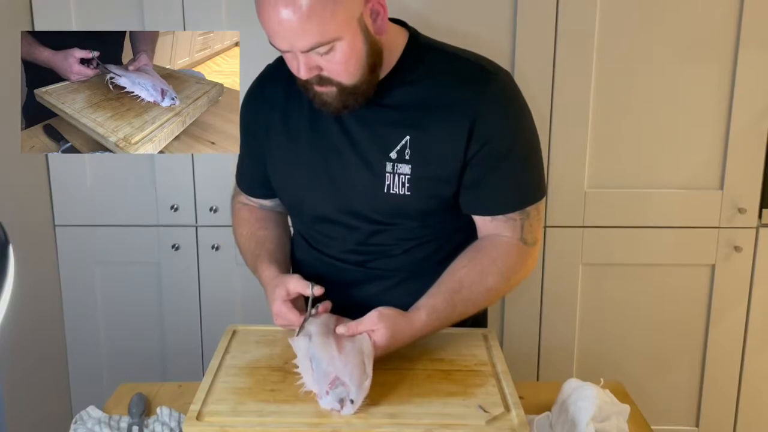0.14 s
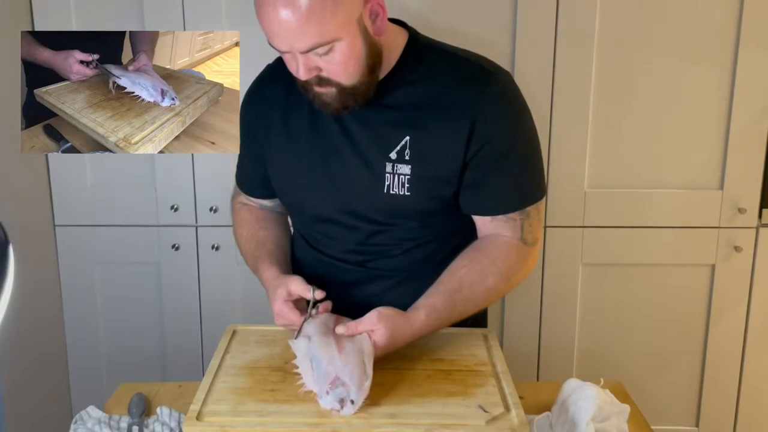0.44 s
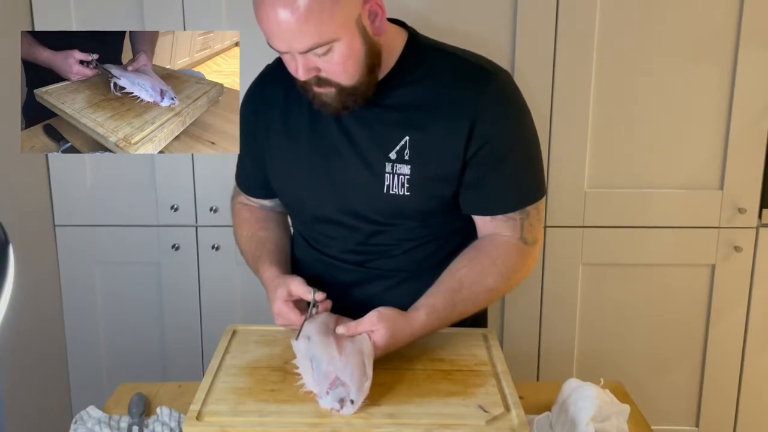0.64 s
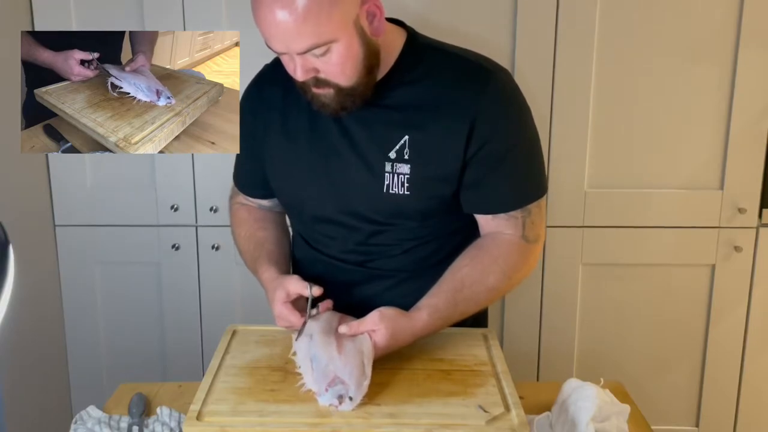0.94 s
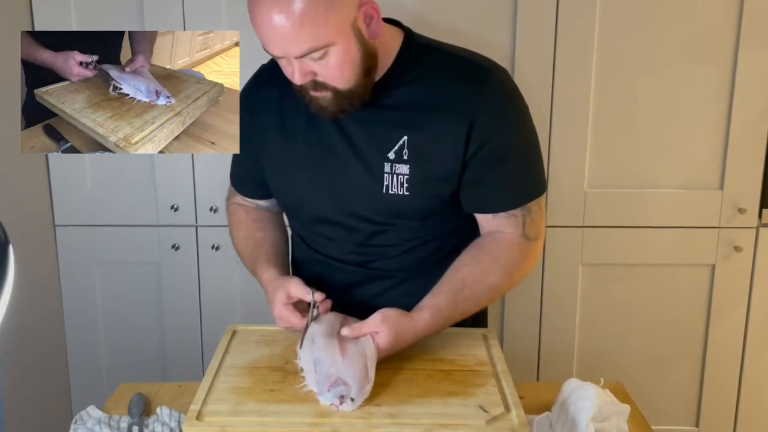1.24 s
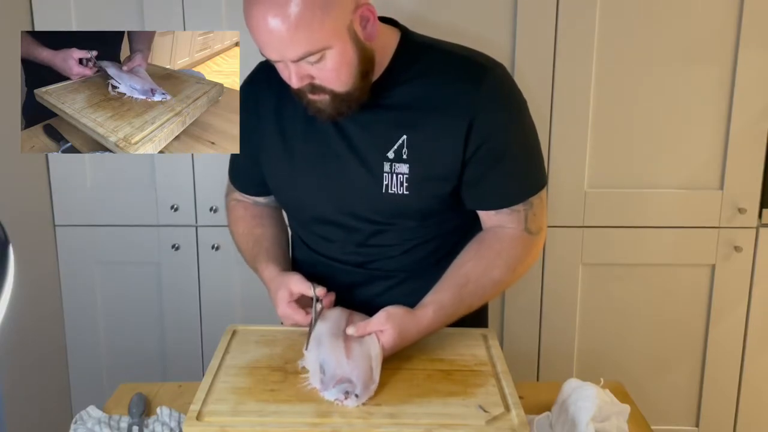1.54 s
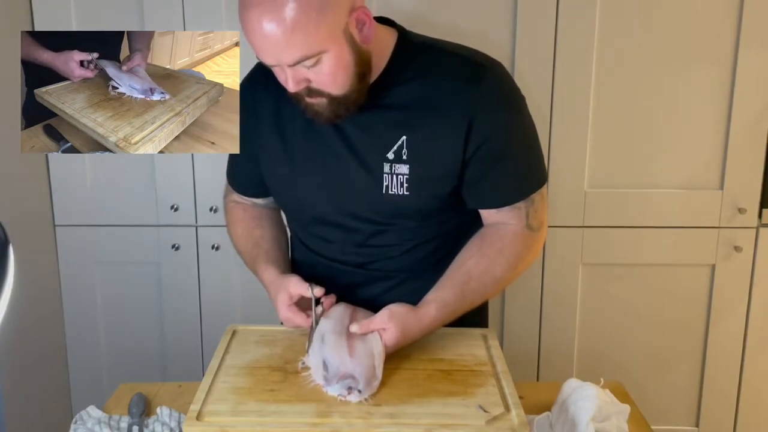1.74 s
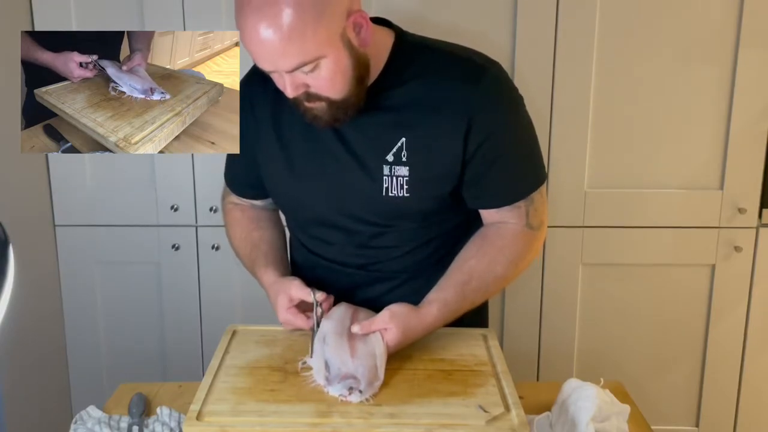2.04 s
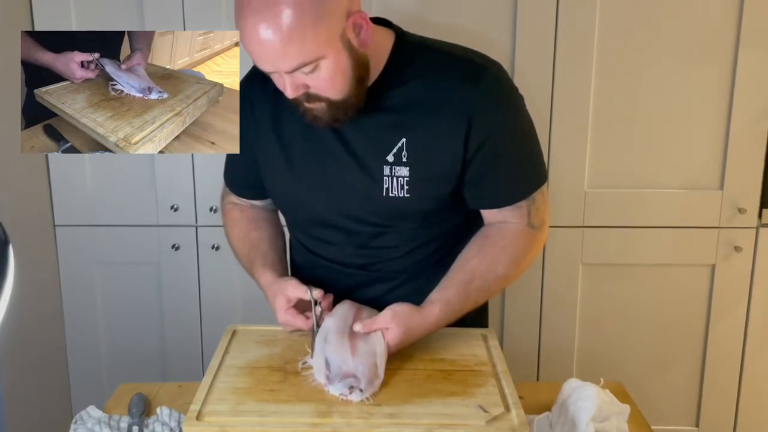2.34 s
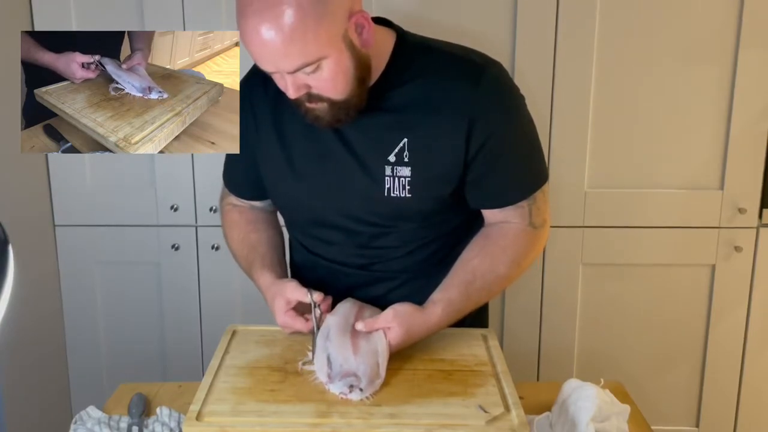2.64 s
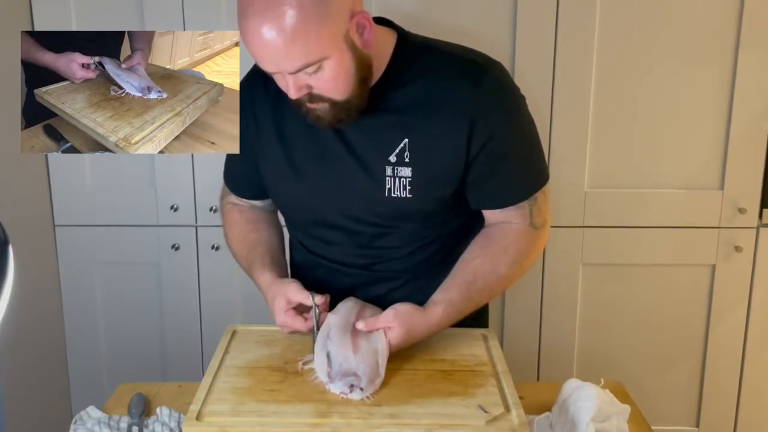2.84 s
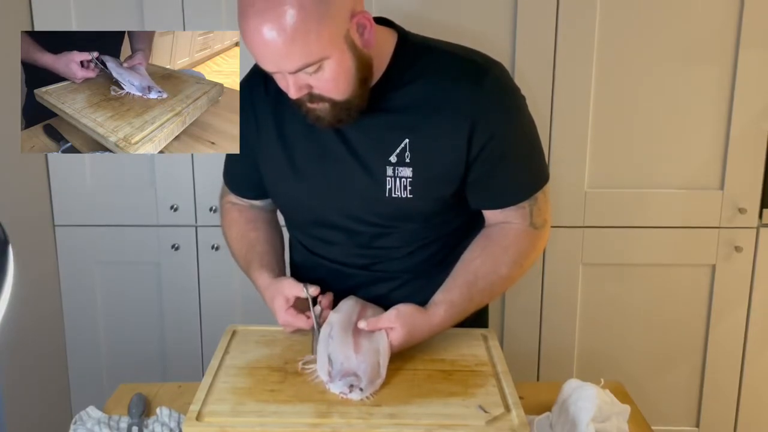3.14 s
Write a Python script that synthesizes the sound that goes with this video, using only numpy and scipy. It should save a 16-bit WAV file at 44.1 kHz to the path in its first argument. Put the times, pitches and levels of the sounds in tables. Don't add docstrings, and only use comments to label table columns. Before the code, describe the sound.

Kitchen scissors cut bony fin spines with dry clustered cracks, faint wet rustles between strokes, then a much louder final snap as the blades shut, with a low board thump, lively room reflections and soft hiss.

```python
import sys
import numpy as np
from scipy import signal
from scipy.io import wavfile
from scipy.ndimage import uniform_filter1d

SR = 44100
rng = np.random.default_rng(int(sys.argv[2]) if len(sys.argv) > 2 else 0)


def ratio(d):
    e = np.asarray(d, float) / 20
    return 10 ** e


def waveform_to_disk(signal):
    frames = np.transpose(np.atleast_2d(signal))
    scaled = np.clip(frames, -1, 1) * 32767
    samples = np.round(scaled).astype(np.int16)
    wavfile.write(sys.argv[1], SR, samples)


N = 145530
LEAD = SR // 4


def evened(x):
    return x / np.sqrt(np.mean(x ** 2) + 1e-20)


def read(points, hz):
    f, value = np.transpose(points)
    return np.interp(np.log(hz + 1), np.log(f + 1), value)


def add(mix, start_s, sound):
    part = mix[LEAD + round(start_s * SR):][:len(sound)]
    part += sound[:len(part)]


def ring(x, hz, width_hz):
    r = np.exp(-np.pi * abs(width_hz) / SR)
    side = np.sqrt(1 - r)
    poles = [1, -2 * r * np.cos(2 * np.pi * hz / SR), r * r]
    return signal.lfilter([side, 0, -side], poles, x) * np.sqrt(hz / SR)


def coloured(x, points):
    hz = np.abs(np.fft.fftfreq(512, 1 / SR))
    log_gain = np.log(ratio(read(points, hz)))
    impulse = np.fft.ifft(np.exp(np.conj(signal.hilbert(log_gain)))).real
    return signal.lfilter(impulse[:128], 1, x)


# frequency in Hz, density in dB per Hz.
TONE_COLOUR = [(20, -8), (70, -14), (200, -13.5), (520, -25), (1700, -30), (4500, -33), (10000, -30),
               (15800, -28.5)]
# frequency in Hz, width in Hz, level in dB.
APPLIANCE_MURMUR = [(45, 45, -74), (100.4, 35, -74.5), (206, 8.9, -76.5)]
TONE_DB, PATCHY_DB = -62.5, 1.72


def room_tone():
    frames, hz = N // 512 + 5, np.fft.rfftfreq(2048, 1 / SR)
    real, imaginary, patches = rng.standard_normal((frames, 1025, 3)).T
    patches = uniform_filter1d(patches, size=16, axis=0)
    patches = evened(uniform_filter1d(patches, size=8, axis=1))
    gain = ratio(read(TONE_COLOUR, hz)[:, None] + PATCHY_DB * patches)
    spectrum = (real + 1j * imaginary) * gain * (hz[:, None] > 0)
    hiss = signal.istft(spectrum, nperseg=2048, noverlap=1536)[1][:N]
    tone = ratio(TONE_DB) * evened(hiss)
    air = rng.standard_normal((len(APPLIANCE_MURMUR), N))
    for noise, (mode_hz, width_hz, db) in zip(air, APPLIANCE_MURMUR):
        drone = ring(ring(noise, mode_hz, width_hz), mode_hz, width_hz)
        tone = tone + ratio(db) * evened(drone)
    return tone


CRACKS_PER_S, CRACK_SPREAD_DB = 16000, 1.7
CRACK_FALL = 1.4


def cracks(rise_s, decay_s, draws):
    t = np.arange(draws.shape[1]) / SR
    size = ratio(CRACK_SPREAD_DB * -np.log(draws[0] + 1e-3))
    sign = np.sign(draws[1] - 0.5)
    happens = draws[2] < CRACKS_PER_S / SR
    swell = 1 - np.exp(-t / max(rise_s, 1e-4))
    fade = np.exp(-(t / max(decay_s, 2e-4)) ** CRACK_FALL)
    return evened(size * sign * happens) * swell * fade


# frequency in Hz, width in Hz, level in dB.
RING_MODES = [(6000, 1000, -6), (6620, 400, -2), (9000, 3300, -15), (2252, 40, -5), (1654, 70, -4.5)]
# frequency in Hz, level in dB.
SPRAY_COLOUR = [(500, -15.5), (1200, -0.5), (3000, 2), (5000, -2.5), (9000, 5), (13000, 1), (16000, 2)]
KNOCK_WIDTH_HZ, KNOCK_LOW_RATIO, KNOCK_LOW_DB = 660, 0.77, -4.5


def spine(level_db, treble_db, knock_hz, decay_s, draws, rise_s, ring_db, spray_db):
    burst = cracks(rise_s, decay_s, draws)
    knock = ring(burst, knock_hz, KNOCK_WIDTH_HZ)
    low_knock = ring(burst, KNOCK_LOW_RATIO * knock_hz, KNOCK_WIDTH_HZ / 2)
    knock = knock + ratio(KNOCK_LOW_DB) * low_knock
    edge = sum(ratio(db) * ring(burst, hz, width_hz) for hz, width_hz, db in RING_MODES)
    treble = ratio(ring_db) * edge + ratio(spray_db) * coloured(burst, SPRAY_COLOUR)
    return ratio(level_db) * (knock + ratio(treble_db) * treble)


# start in seconds, level in dB,
# treble against the knock in dB, knock pitch in Hz, crunch decay in seconds.
EARLIER_SNIP = [
    (-0.099, -31.5, -9.5, 2430, 0.0057),
]
# start in seconds, level in dB,
# treble against the knock in dB, knock pitch in Hz, crunch decay in seconds.
THICK_SPINES = [
    (0.4004, -36, -3, 2290, 0.0063),
    (.5158, -39, -4, 2050, 0.0093),
    (1.157, -48, -1, 2270, 0.004),
    (1.1645, -40, -3, 2200, 0.0072),
    (1.2121, -39.5, -2.5, 2200, 0.0091),
]
# start in seconds, level in dB,
# treble against the knock in dB, knock pitch in Hz, crunch decay in seconds.
THIN_SPINES = [
    (0.5466, -35.5, -7, 1900, 0.0042),
    (.551, -37, -5, 3200, .002),
    (.557, -37, -4.5, 1520, 0.006),
    (1.2688, -43.5, 0.5, 2240, 0.0085),
    (1.3142, -39, -6.5, 2000, 0.0066),
    (1.326, -43, -6.5, 2550, .005),
    (2.012, -46, 4.5, 2200, 0.0053),
    (2.069, -50, 3, 3300, 0.0023),
    (2.8325, -18, -16, 2260, 0.0017),
]
# start in seconds, level in dB,
# treble against the knock in dB, knock pitch in Hz, crunch decay in seconds.
SOFT_RAYS = [(1.945, -47, 4, 1620, 0.0066), (2.004, -50.5, 6.5, 2800, 0.0072),
             (2.088, -48, 6, 1980, 0.0036), (2.095, -47, 1, 3120, .011), (2.162, -46.5, -8, 2530, 0.009),
             (2.659, -53, -0.5, 1660, 0.022), (2.69, -51.5, -2.5, 2200, 0.011),
             (2.718, -45, 1, 2310, 0.0065), (2.7955, -32, -7, 3170, 0.0034),
             (2.7995, -22.5, -7.5, 3200, 0.0047), (2.8045, -19.5, -8, 2340, 0.003)]


def add_spines(cut, draws):
    kinds = [(THICK_SPINES + EARLIER_SNIP, dict(rise_s=0.0012, ring_db=-1, spray_db=-11)),
             (THIN_SPINES, dict(rise_s=0.0004, ring_db=-16, spray_db=-3.8)),
             (SOFT_RAYS, dict(rise_s=0.0042, ring_db=-10, spray_db=-1.8))]
    for (rows, kind), kind_draws in zip(kinds, draws):
        for (start_s, *row), d in zip(rows, kind_draws):
            add(cut, start_s, spine(*row, d, **kind))


# frequency in Hz, 60 dB decay time in seconds.
KITCHEN_DECAY = [(250, 1), (1000, 0.78), (2500, 0.82), (6000, 0.6), (12000, 0.5), (16000, 0.38)]
KITCHEN_DB, KITCHEN_GAP_S, NEAR_DB, NEAR_T60_S = -3.5, 0.0051, -3, 0.048
TURN_S = 0.009


def kitchen(x):
    out, t = np.zeros(len(x)), np.arange(SR) / SR
    turn = np.pi * np.arange(len(x)) / SR / TURN_S
    for k in range(3):
        taps = np.zeros(SR)
        at = np.arange(0, SR - 8, 8) + rng.integers(0, 8, (SR - 1) // 8)
        taps[at] = rng.choice([-1., 1.], at.shape)
        hz, frame_s, spectrum = signal.stft(taps, SR, nperseg=256)
        fade = ratio(-60 * frame_s / read(KITCHEN_DECAY, hz)[:, None])
        tail = signal.istft(spectrum * fade, SR, nperseg=256)[1][:SR]
        near = taps[::-1] * ratio(-60 * t / NEAR_T60_S)
        tail = ratio(KITCHEN_DB) * tail / np.linalg.norm(tail)
        near = ratio(NEAR_DB) * near / np.linalg.norm(near)
        build_up = np.clip(t / KITCHEN_GAP_S, 0, 1) ** 2
        share = np.sqrt(2 / 3) * np.cos(turn + k * np.pi / 3)
        out += signal.fftconvolve(x * share, (tail + near) * build_up)[:len(x)]
    return out


RUSTLE_WIDTH, RUSTLE_GRAIN_DB = 0.59, 3


def rustle(level_db, length_s, centre_hz):
    noise, grain = rng.standard_normal((SR, 2)).T
    t = np.arange(SR) / SR
    grains = noise * ratio(RUSTLE_GRAIN_DB * evened(uniform_filter1d(grain, size=200)))
    slide = evened(ring(grains, centre_hz, RUSTLE_WIDTH * centre_hz))
    return ratio(level_db) * slide * np.sin(np.pi * np.clip(t / length_s, 0, 1))


# start in seconds, level in dB, length in seconds, centre in Hz.
FISH_SHIFTS = [
    (0.722, -74, 0.3, 1790),
    (1.401, -78.5, 0.34, 1470),
    (1.778, -82, 0.094, 1900),
    (2.2, -79, 0.32, 1440),
    (2.097, -66, 0.076, 9000),
    (2.65, -73, 0.1, 510),
]


def add_rustles(cut):
    for start_s, *row in FISH_SHIFTS:
        add(cut, start_s, rustle(*row))


def board(level_db, hz, rise_s, t60_s):
    t = np.arange(SR) / SR
    return ratio(level_db - 60 * t / t60_s) * (1 - np.exp(-t / rise_s)) * np.sin(2 * np.pi * hz * t)


# start in seconds, level in dB, pitch in Hz,
# rise in seconds, 60 dB decay time in seconds.
BOARD_SHAKES = [
    (1.992, -56, 45, 0.023, 0.87),
    (2.84, -40.5, 42, 0.012, 0.58),
    (3.02, -48.5, 39, 0.054, 1),
    (2.8, -52, 394, 0.0025, 0.12),
    (2.834, -43, 454, 0.00094, 0.062),
    (2.834, -49.5, 280, 0.0021, 0.077),
]


def add_shakes(low):
    for start_s, *row in BOARD_SHAKES:
        add(low, start_s, board(*row))


# frequency in Hz, width in Hz, level in dB.
SHUT_BLADES = [(1470, 280, -4.5), (2200, 770, -17.5), (3830, 410, 0), (4500, 540, -3.5), (7000, 690, 2),
               (8630, 340, -2), (10320, 600, 2), (11700, 770, -2), (13750, 540, 0.5), (14600, 770, -1),
               (15800, 840, 1.5)]
# frequency in Hz, width in Hz, level in dB.
LINGERING_MODES = [(6470, 78, -22), (10370, 51, -10.5), (3800, 33, -22)]
LEAST_WIDTH_HZ, CLACK_RISE_S, CLACK_SPRAY_DB = 400, 0.0002, -8


def clack(level_db, decay_s, draws):
    rattle = cracks(CLACK_RISE_S, decay_s, draws)
    sound = ratio(CLACK_SPRAY_DB) * coloured(rattle, SPRAY_COLOUR)
    for k, (hz, width_hz, db) in enumerate(SHUT_BLADES):
        sound = sound + (-1) ** k * ratio(db) * ring(rattle, hz, max(width_hz, LEAST_WIDTH_HZ))
    for hz, width_hz, db in LINGERING_MODES:
        sound = sound + ratio(db) * ring(rattle, hz, width_hz)
    return ratio(level_db) * sound


# start in seconds, level in dB, rattle decay in seconds.
CLACK_ARRIVALS = [
    (2.8347, -24, 0.0007),
    (2.8353, -15, 0.0011),
    (2.8372, -24, 0.0011),
    (2.8390, -24, 0.0019),
    (2.8413, -26.5, 0.001),
    (2.8426, -19.5, 0.0012),
    (2.8568, -39, .002),
]


def add_clacks(cut, draws):
    for (start_s, *row), d in zip(CLACK_ARRIVALS, draws):
        add(cut, start_s, clack(*row, d))


def scene():
    tone, cut, low = room_tone(), np.zeros(N + LEAD), np.zeros(N + LEAD)
    draws = rng.random((4, 14, 3, 3000))
    add_spines(cut, draws[:3])
    add_rustles(cut)
    add_shakes(low)
    add_clacks(cut, draws[3])
    return ((cut + kitchen(cut) + low)[LEAD:] + tone)[None]


def roll_off(x):
    return signal.sosfilt(signal.butter(12, 16810, fs=SR, output="sos"), x)


EDGE_HZ, LEAK_DB, OFFSET = 15830, -40, -0.0011


def record(dry):
    lowpass = signal.firwin(1501, EDGE_HZ, window=("kaiser", 9), fs=SR)
    low = signal.oaconvolve(dry, lowpass[None], "same")
    mix = low + ratio(LEAK_DB) * (dry - low) + OFFSET
    return roll_off(mix)


dry = scene()
out = record(dry)
waveform_to_disk(out)
```